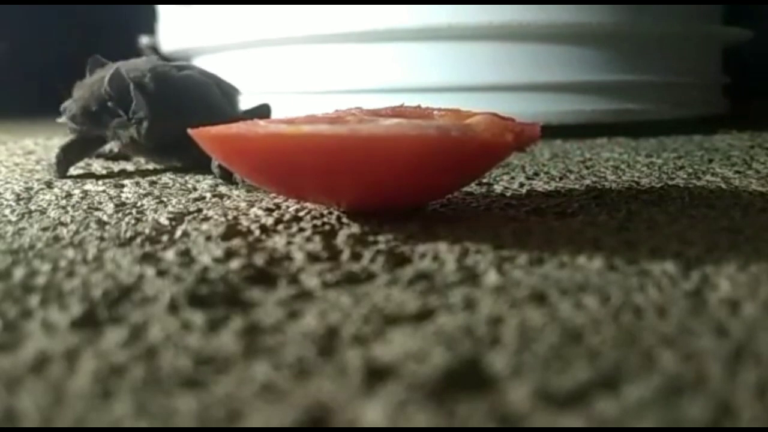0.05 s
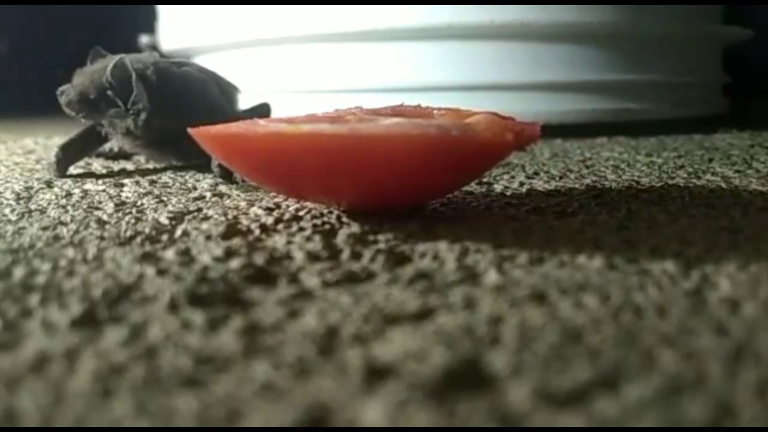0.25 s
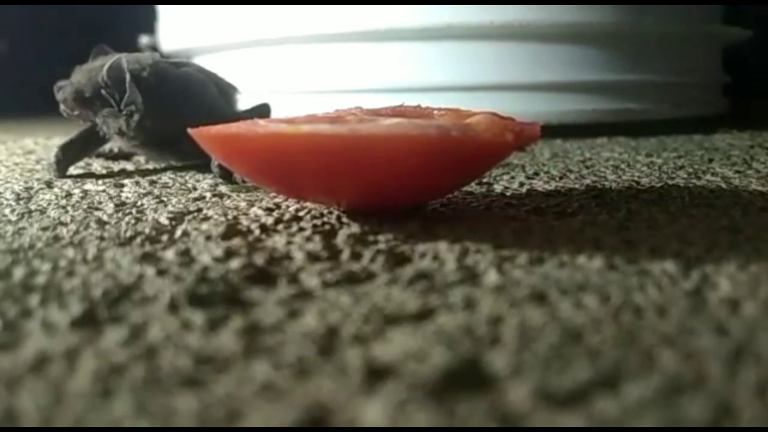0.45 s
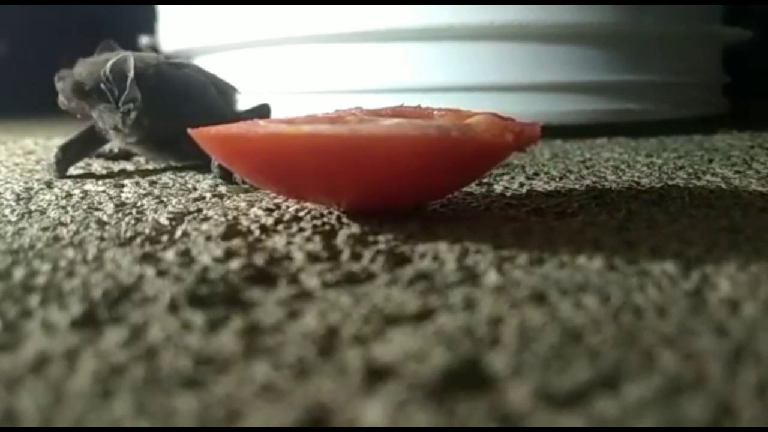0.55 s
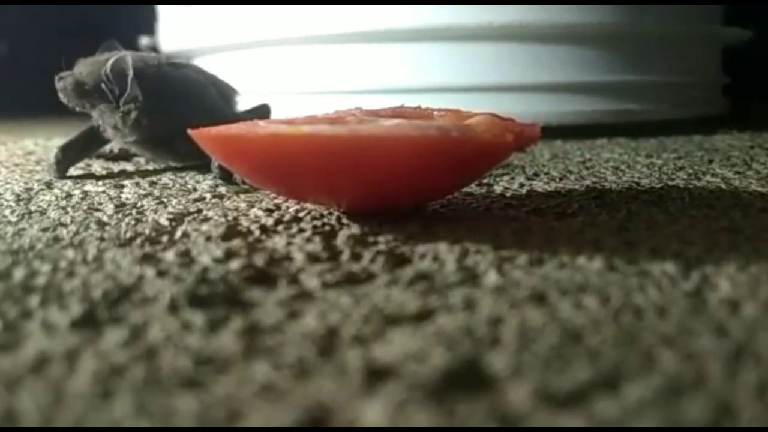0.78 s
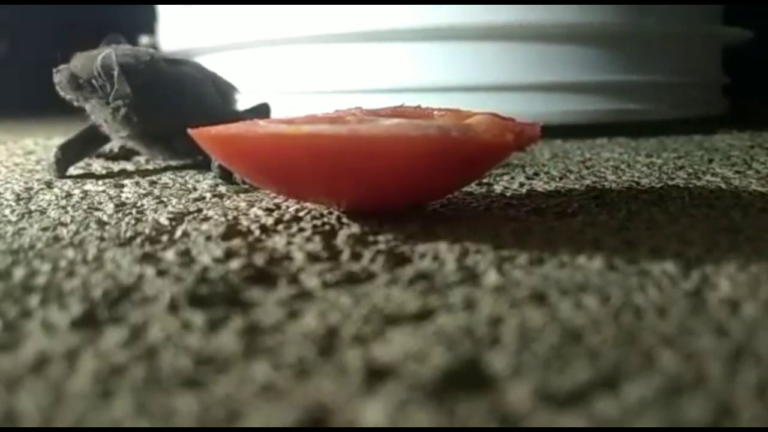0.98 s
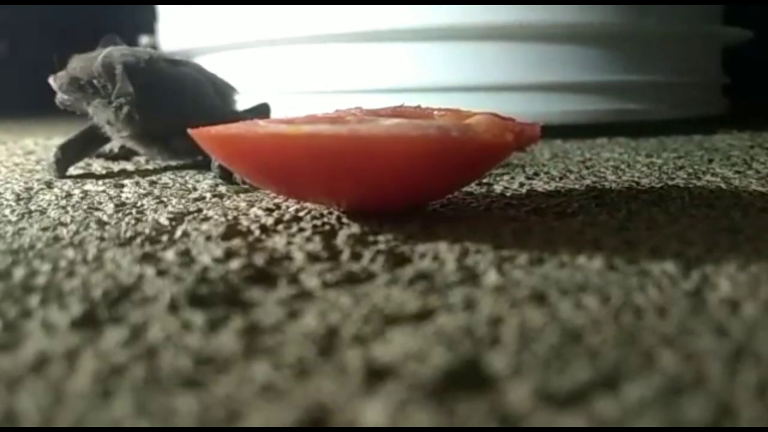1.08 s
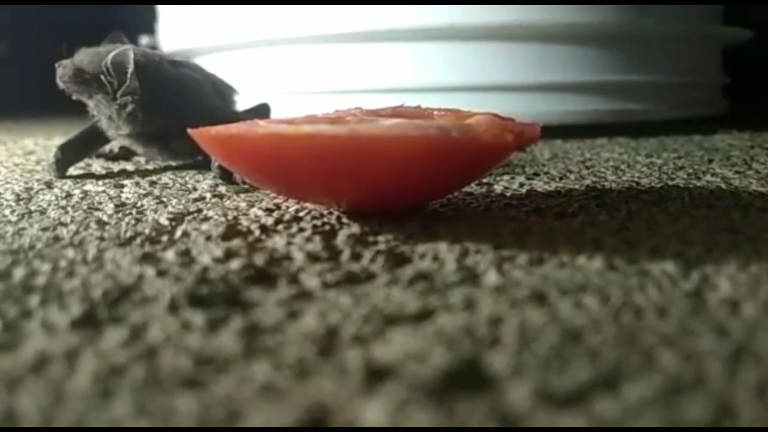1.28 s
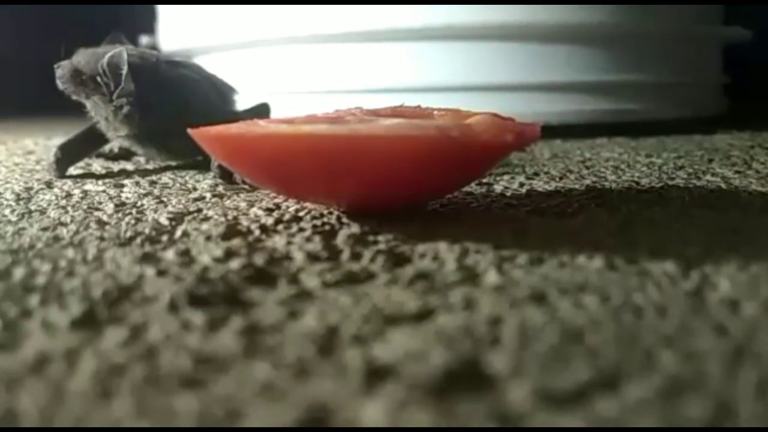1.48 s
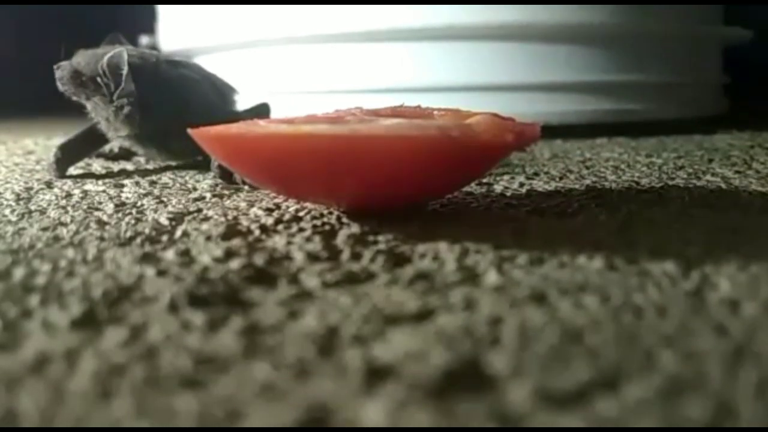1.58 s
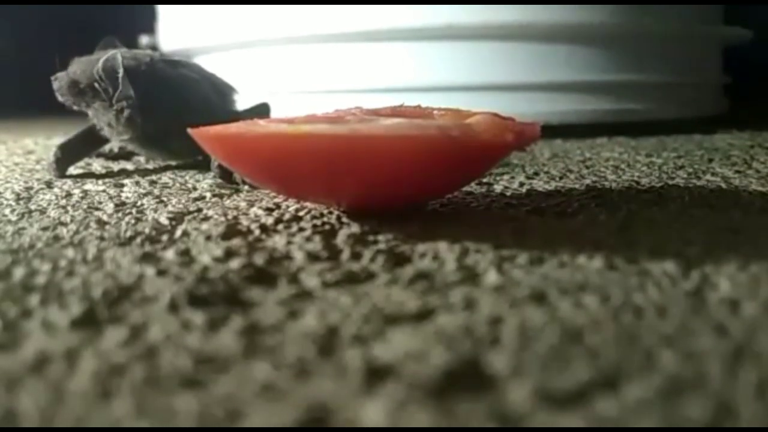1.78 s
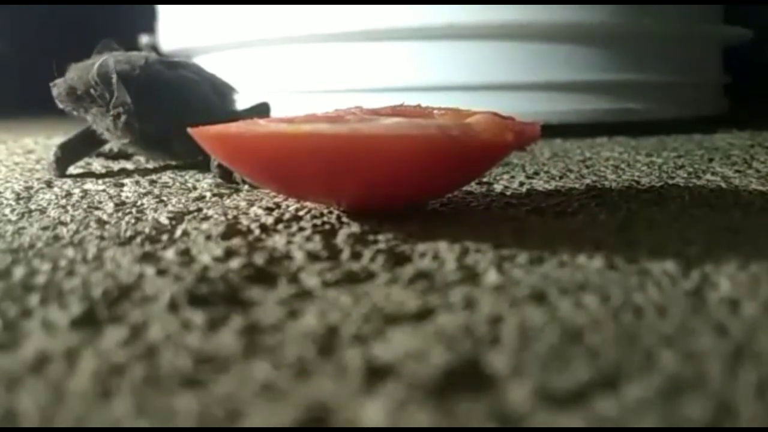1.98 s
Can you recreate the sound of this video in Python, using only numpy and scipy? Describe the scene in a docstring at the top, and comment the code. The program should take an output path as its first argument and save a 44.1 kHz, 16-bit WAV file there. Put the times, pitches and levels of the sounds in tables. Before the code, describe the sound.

A small bat chirps close to the microphone in a small room. From about 0.1 to 1.1 seconds it gives nine very short, very high-pitched chirps, each falling steeply with a slight rasp. Faint scuffing on the concrete floor comes between them, mostly from 0.5 to 1 second. After a pause, one last chirp sounds near 1.8 seconds. A faint low machine hum continues throughout.

```python
"""A small room with a concrete floor, a stereo microphone close to a small bat on the ground.
The bat gives ten short, steeply falling chirps, each a rough whistle with a rasp at its peak.
The ultrasonic third harmonic of the strongest chirps folds down in the recorder as a rising tick.
Faint scuffing comes between the calls; a machine hums low in the background."""
import sys
import numpy as np
from scipy import signal
from scipy.fft import rfft, irfft, next_fast_len
from scipy.io import wavfile
from scipy.ndimage import uniform_filter1d, map_coordinates

SR = 44100
rng = np.random.default_rng(int(sys.argv[2]) if len(sys.argv) > 2 else 0)


def unload_audio(sound):
    """Save the sound as a 16-bit wav file, at the path given as the first command line argument."""
    columns = np.transpose(np.atleast_2d(sound))
    # keep every value between -1 and 1, then stretch to whole-number steps
    steps = np.round(np.clip(columns, -1, 1) * 32767)
    wavfile.write(sys.argv[1], SR, steps.astype(np.int16))


N = 90404
TIME = np.arange(N) / SR

# The calls, close up (start [s], length [s], whistle ceiling [Hz], glide start [Hz], glide end [Hz],
# whistle gain [dB], third harmonic gain [dB], its attack [s], rasp gain [dB], room send [dB])
BAT_CALLS = [(.0975, .0098, 15500, 13600, 11000, -25, -52, .001, -52, -22),
             (.2302, .0068, 15500, 14500, 11400, -4.5, -34, .006, -27.5, -20.5),
             (.3213, .0122, 14000, 13400, 10650, -7.5, -44, .006, -38, -24),
             (.4310, .0145, 15800, 15800, 13200, -22, -62, .006, -62, -13),
             (.5235, .0250, 14050, 14950, 11400, -5.5, -12, .0005, -34, -18),
             (.6532, .0235, 15200, 15100, 11500, -7.5, -13.5, .0005, -31, -11.5),
             (.7760, .0195, 15300, 15100, 11300, -6.5, -19, .0006, -27, -14.5),
             (.9728, .0195, 15200, 12700, 9950, -2.5, -36, .003, -26.5, -20),
             (1.0942, .0105, 15300, 14000, 11600, -9, -42, .006, -35, -20),
             (1.7681, .0108, 15200, 13800, 11250, -5.5, -27, .007, -25, -19)]
# Microphone response to the whistle (frequency [Hz], gain [dB])
MIC_TREBLE = [(9000, -6), (10500, -10), (12500, -2.5), (14700, -14), (15400, -5.5), (16000, -10.5),
              (17000, -24.5)]
# Spectrum of the rasp (frequency [Hz], relative level [dB])
RASP_SPECTRUM = [(100, 15), (300, 6.5), (1200, 4.5), (3000, -3.5), (5000, 1.5), (8000, 2), (10000, 11),
                 (12000, 6), (16000, 2.5)]
def bat(flutter_db=1.5, flutter_rate=600):
    """Close to the microphone: each whistle swells and fades in one arch, rasping only at the top."""
    out, rasp = np.zeros((2, N)), noise(RASP_SPECTRUM)
    for (start, length, ceiling_hz, knee_hz, end_hz,
         whistle_db, harmonic_db, attack_s, rasp_db, room_db) in BAT_CALLS:
        t = np.clip(TIME - start, 0, length)
        hz = dive(t, length, knee_hz, end_hz) * (1 + .006 * wobble(flutter_rate))
        arch = np.abs(np.sin(np.pi * (t / length) ** 1.11)) ** .76  # peaks a little late
        pitch = np.minimum(hz, ceiling_hz)
        gain = amp(whistle_db + along(MIC_TREBLE, pitch) + flutter_db * wobble(flutter_rate))
        whistle = gain * arch * rough_tone(pitch, rough_db=-17)
        tick = amp(harmonic_db) * folded_harmonic(hz, t, length, attack_s)
        out += mic_ports(whistle) + lean_right(tick, left_db=-24)
        out += lean_right(amp(rasp_db) * arch ** 7 * rasp, left_db=-2.5)
        out += near_reflections(whistle) + amp(room_db) * room_tail(whistle + amp(-9) * tick)
    return out


def dive(t, length, knee_hz, end_hz, start_hz=17170, dive_s=.001868, hook_hz=964, hook_s=.0014):
    """The pitch of a chirp: a fast dive, a straight glide, and a downward hook as it ends."""
    glide = knee_hz + (end_hz - knee_hz) * t / length
    plunge = (start_hz - knee_hz) * np.exp(-t / dive_s)
    hook = hook_hz * np.exp((t - length) / hook_s)
    return glide + plunge - hook


# Microphone response to the third harmonic (pitch of the chirp [Hz], gain [dB])
MIC_ULTRASOUND = [(12800, -30), (13100, -21), (13400, -9), (13750, -20), (14000, -6), (14220, -17),
                  (14520, -2.5), (14850, -14), (15250, -14), (15550, -7), (15950, -13), (16400, -2),
                  (16800, 0), (17500, -3)]
def folded_harmonic(hz, t, length, attack_s, release_s=.0031, converter_hz=48000):
    """The recorder's converter mirrors the third harmonic, so it rises as the chirp falls."""
    gate = ramp(t / attack_s) * ramp((length - t) / release_s)
    return amp(along(MIC_ULTRASOUND, hz)) * gate * rough_tone(converter_hz - 3 * hz, rough_db=-3)


def mic_ports(x, lag_s=1.3e-5):
    """The sound reaches the left microphone port and, a moment later, the right."""
    return filtered(x, lambda hz: np.exp(-2j * np.pi * hz * np.array([[0], [lag_s]])))


def click(start_s=.9685, level_db=-27, decay_s=.0008):
    """One tiny dry click just before the lowest chirp, perhaps from the bat's mouth."""
    t = TIME - start_s
    return amp(level_db) * (t > 0) * np.exp(-np.abs(t) / decay_s) * noise(RASP_SPECTRUM)


# Strength of the nearest reflections at the microphone (left [dB], right [dB])
REFLECTION_DB = [-12, -10]
def near_reflections(x, count=6, spread_s=.003):
    """Weak copies off the floor and the things around the bat."""
    delays = (rng.random((2, count)) * spread_s * SR).astype(int) + 1
    copies = np.array([sum(np.roll(x, d) for d in side) for side in delays])
    return amp(REFLECTION_DB)[:, None] * copies / np.sqrt(count)


# Decay of the small room (frequency [Hz], time to fall 60 dB [s])
ROOM_DECAY = [(500, .3), (3000, 0.076), (9000, 0.2), (12000, 0.17), (16000, 0.053)]
# Colour of its tail (frequency [Hz], gain [dB])
ROOM_RESPONSE = [(300, -11.5), (1300, -3.5), (2050, 11.5), (3100, 12), (4200, 8.5), (6000, 4), (9000, 14),
                 (11500, 1), (13200, 2.5), (15200, 23)]
def room_tail(x, build_s=.003):
    """The room answers with a diffuse tail on each side, the highest treble dying first."""
    hz, t, spectra = signal.stft(rng.standard_normal((2, SR // 2)), SR, nperseg=256)
    decay = amp(-60 * t / along(ROOM_DECAY, hz)[:, None])
    tail = signal.istft(spectra * decay * ramp(t / build_s), SR, nperseg=256)[1]
    wet = signal.fftconvolve(x[None], tail / np.linalg.norm(tail[0]), axes=1)[:, :N]
    return filtered(wet, lambda hz: amp(along(ROOM_RESPONSE, hz)))


# A faint resonance (time [s], pitch [Hz], level [dB])
RESONANCE = [(.55, 2167, -50), (.58, 2200, -45.5), (.62, 2170, -86), (.68, 2055, -53), (.75, 2030, -69),
             (.81, 2040, -47.5), (.87, 1968, -54.5), (.93, 1935, -67.5)]
def faint_ring(width_hz=420):
    """A fuzzy, slightly sinking resonance that comes and goes between the strongest chirps."""
    hz, level_db = curves(RESONANCE)
    bands = np.array([wobble(width_hz) * tone(hz) for side in range(2)])
    sounding = (TIME > RESONANCE[0][0]) & (TIME < RESONANCE[-1][0])
    return amp(level_db) * sounding * bands


def lingering_echo(level_db=-36, t60=.097):
    """The room still rings from a chirp just before the start."""
    chirp_band = [(9000, -35), (10700, 1), (12800, 5), (14500, -18), (16000, -29)]  # (Hz, dB)
    return amp(level_db - 60 * TIME / t60) * noise(chirp_band)


# Rubbing on the concrete (time [s], level [dB])
RUB_LEVEL = [(0, -66), (.12, -59), (.2, -55.5), (.31, -60), (.40, -70), (.45, -52), (.505, -39.5),
             (.55, -50.5), (.59, -44.5), (.64, -56.5), (.70, -41.5), (.75, -50), (.82, -43), (.91, -58),
             (.99, -48.5), (1.15, -62), (1.4, -67.5), (1.85, -61.5), (2.05, -66.5)]
# Its spectrum (frequency [Hz], relative level [dB])
RUB_SPECTRUM = [(300, -11), (1000, -9), (1500, -16), (2000, -2), (2500, -7), (3100, -9.5), (4200, -9.5),
                (5500, -9), (6500, -9.5), (8200, -12), (9700, -7), (11000, -6), (15000, -11)]
# Short scrapes on the floor (time [s], level [dB])
FLOOR_SCRAPES = [(0.496, -41), (0.575, -48.5), (0.874, -45)]
# Their spectrum (frequency [Hz], relative level [dB])
SCRAPE_SPECTRUM = [(300, 9), (900, 2), (1500, 9), (2200, -2.5), (3000, 5.5), (5000, -23), (10000, -24.5),
                   (15000, -30.5)]
def scuffing(grain_db=2.5, grain_rate=300, scrape_s=.0148):
    """Faint grainy rubbing on the floor, with a few short scrapes."""
    rub_db, = curves(RUB_LEVEL)
    scrapes = sum(amp(db) * np.exp(-((TIME - s) / scrape_s) ** 2) for s, db in FLOOR_SCRAPES)
    grain = unit(amp(grain_db * wobble(grain_rate)))
    return grain * (amp(rub_db) * noise(RUB_SPECTRUM) + scrapes * noise(SCRAPE_SPECTRUM))


# The machine's four tones, lowest first (time [s], pitch [Hz], level before trim [dB])
MACHINE_DRONE = [(0.0, 36.4, -43), (0.3, 39.4, -90), (0.56, 36.5, -30), (0.61, 39, -45), (0.66, 37.68, -40),
                 (2.05, 36.8, -37)]
MACHINE_HUM = [(0.0, 53.2, -36.5), (0.05, 52.13, -37.5), (0.39, 53.25, -32.5), (1.23, 52.32, -37),
               (1.41, 53.97, -46.5), (1.57, 52.64, -35.5), (1.91, 52.4, -39.5), (2.05, 50.9, -47)]
MACHINE_WHIR = [(0.0, 144.3, -49), (0.16, 142.9, -50.5), (0.19, 139.8, -66), (0.24, 148.3, -40),
                (0.3, 143.6, -52.5), (0.71, 150.6, -51), (1.23, 144.5, -53), (1.27, 142.2, -72.5),
                (1.35, 149.2, -56.5), (1.59, 153.3, -48.5), (1.73, 150.9, -65), (1.75, 151.7, -50.5),
                (2.0, 155.8, -55), (2.05, 156.8, -64)]
MACHINE_WHINE = [(0.0, 321.6, -68.5), (1.45, 301.9, -63.5), (1.56, 308, -57.5), (1.8, 311.2, -65),
                 (1.95, 320.1, -53.5), (2.05, 313.5, -71)]
def machine(waver_db=3.5, waver_rate=15.42):
    """In the background a machine hums on four drifting tones, the upper two wavering."""
    lows = machine_tone(MACHINE_HUM, trim_db=-.5) + machine_tone(MACHINE_DRONE, trim_db=-2.5)
    whir = amp(waver_db * wobble(waver_rate)) * machine_tone(MACHINE_WHIR, trim_db=-.5)
    whine = amp(waver_db * wobble(waver_rate)) * machine_tone(MACHINE_WHINE, trim_db=-2)
    return lows + whir + whine


def machine_tone(track, trim_db):
    """One tone that follows its pitch and level."""
    hz, level_db = curves(track)
    return amp(level_db + trim_db) * tone(hz)


# Room tone at the microphone (frequency [Hz], relative level [dB])
AIR_SPECTRUM = [(12, -33.5), (20, 0), (53, -17.5), (96, -15), (293, -26), (459, -30), (849, -35),
                (4180, -49.5), (6180, -53), (7730, -62), (9950, -60.5), (14300, -74.5), (16000, -92.5)]
# Likeness of its two sides (frequency [Hz], correlation [-1 to 1])
AIR_LIKENESS = [(60, 1.0), (180, 0.98), (550, 0.65), (1650, -0.39), (4970, -0.34), (15000, 0.09)]
def room_tone(level_db=-43.5):
    """The noise of the room all around: a centred rumble under a faint, wide hiss."""
    return amp(level_db) * noise(AIR_SPECTRUM, AIR_LIKENESS)


def noise(colour, likeness=((1000, 0),), patch_db=3):
    """Coloured stereo noise of rms 1 with patches of random gain."""
    spectra = signal.stft(rng.standard_normal((2, N)), nperseg=512)[2]
    patches = uniform_filter1d(rng.standard_normal(spectra.shape[1:]), size=2, axis=0)
    patches = uniform_filter1d(patches, size=12, axis=1)
    patchy = signal.istft(spectra * amp(patch_db * unit(patches)), nperseg=512)[1][:, :N]

    def mid_side_gains(hz):
        angle = np.arccos(np.clip(along(likeness, hz), -1, 1)) / 2
        return amp(along(colour, hz)) * [np.cos(angle), np.sin(angle)]

    mid, side = filtered(patchy, mid_side_gains)
    return unit(np.array([mid + side, mid - side]))


def rough_tone(hz, rough_db, rough_rate=2500):
    """A sine with a skirt of noise around its pitch."""
    return tone(hz) + amp(rough_db) * wobble(rough_rate) * tone(hz)


def tone(hz):
    """A sine of rms 1 on a pitch curve."""
    return np.sqrt(2) * np.sin(2 * np.pi * (np.cumsum(hz) / SR + rng.random()))


def wobble(rate):
    """A smooth random curve, rate knots a second."""
    return map_coordinates(rng.standard_normal(N // 8), [TIME * rate], mode="wrap")


def filtered(x, response):
    """x through a frequency response."""
    size = next_fast_len(N + SR // 2)
    return irfft(rfft(x, size) * response(np.fft.rfftfreq(size, 1 / SR)), size)[..., :N]


def lean_right(x, left_db):
    """Stereo with the left side turned down."""
    return amp([[left_db], [0]]) * x


def along(points, hz):
    """(Hz, value) points read on a log axis."""
    freqs, values = np.transpose(points)
    return np.interp(np.log(hz + 1), np.log(np.sort(freqs) + 1), values)


def curves(rows):
    """One value per sample for each column after the time."""
    times, *columns = np.transpose(rows)
    return [np.interp(TIME, times, column) for column in columns]


def ramp(u):
    """A smooth step from 0 to 1."""
    return np.sin(np.pi / 2 * np.clip(u, 0, 1)) ** 2


def amp(db):
    """Decibels to gain."""
    return 10 ** (np.asarray(db) / 20)


def unit(x):
    """Scaled to rms 1."""
    return x / np.sqrt(np.mean(x ** 2) + 1e-20)


def scene():
    """The bat up close, the machine and the room behind it."""
    return bat() + click() + faint_ring() + lingering_echo() + scuffing() + machine() + room_tone()


# Top edge of the recorder's band (frequency [Hz], gain [dB])
RECORDER_ROLLOFF = [(15400, 0), (15900, -17.5), (16400, -21)]
def record(dry, limit_hz=16400):
    """The recorder rolls off steeply and keeps nothing above its band limit."""
    return filtered(dry, lambda hz: amp(along(RECORDER_ROLLOFF, hz)) * (hz < limit_hz))


dry = scene()
out = record(dry)
unload_audio(out)
```